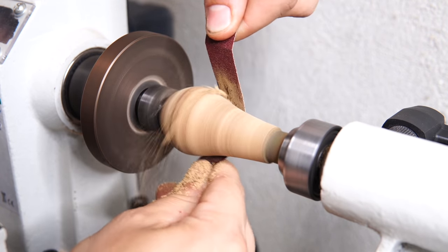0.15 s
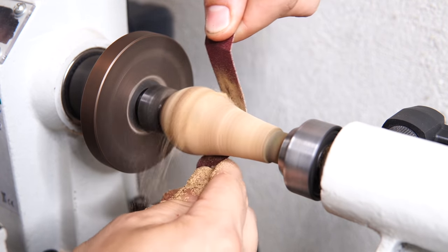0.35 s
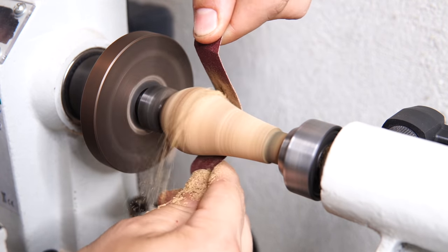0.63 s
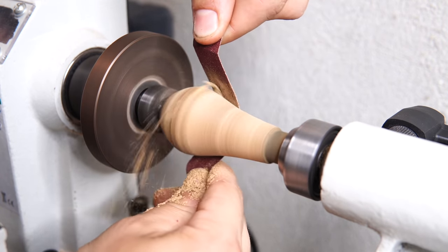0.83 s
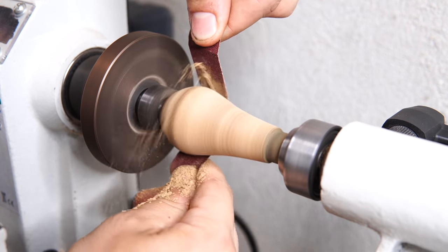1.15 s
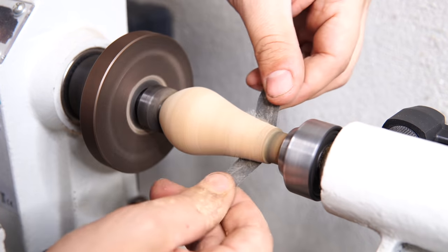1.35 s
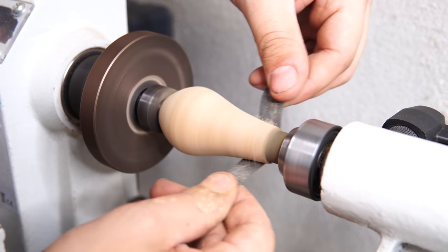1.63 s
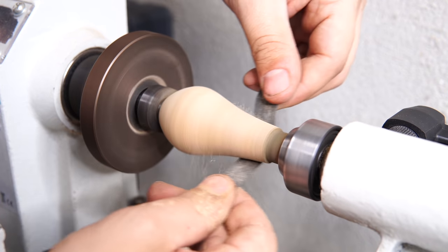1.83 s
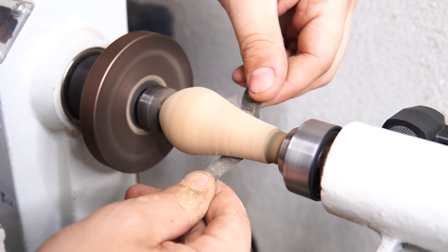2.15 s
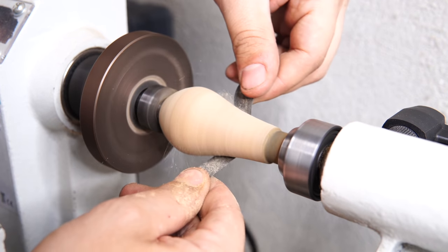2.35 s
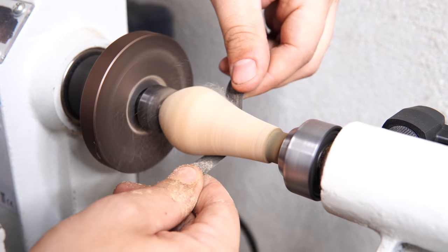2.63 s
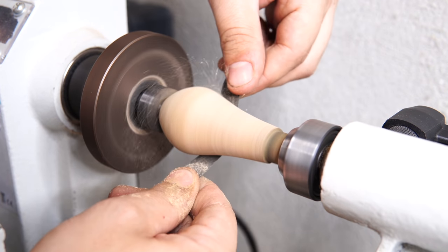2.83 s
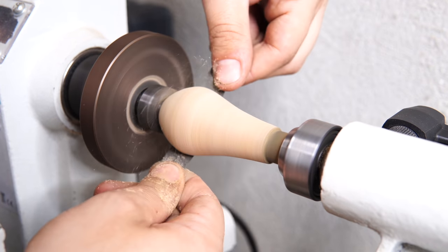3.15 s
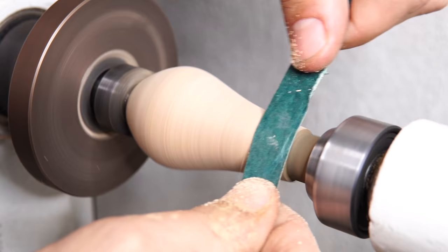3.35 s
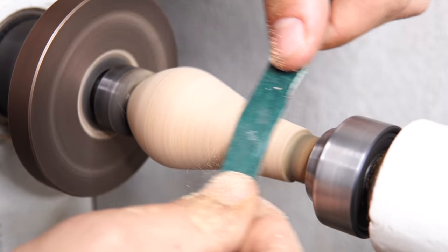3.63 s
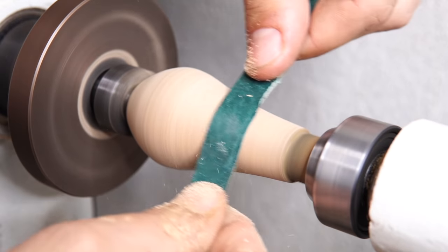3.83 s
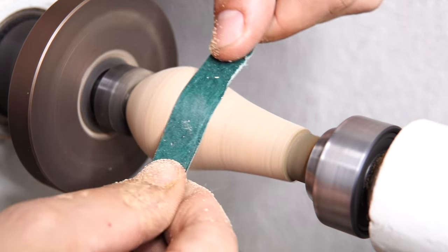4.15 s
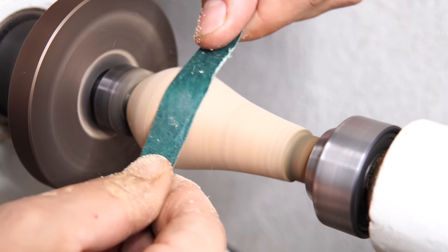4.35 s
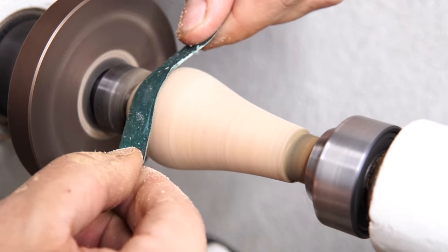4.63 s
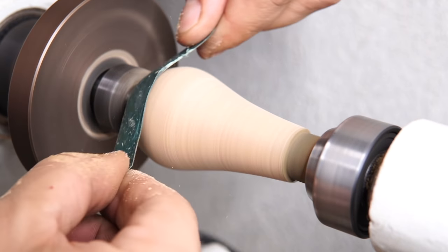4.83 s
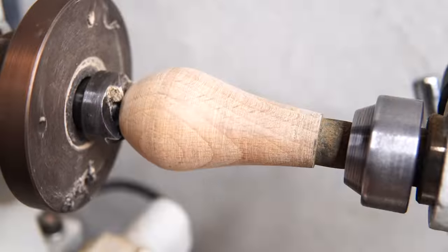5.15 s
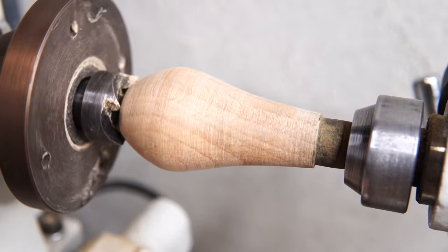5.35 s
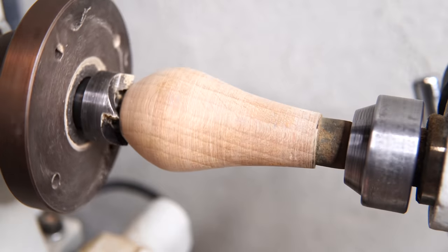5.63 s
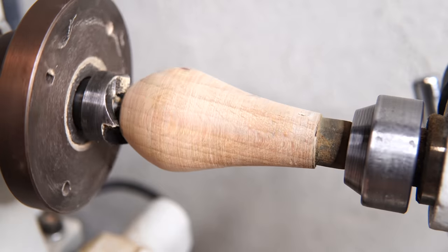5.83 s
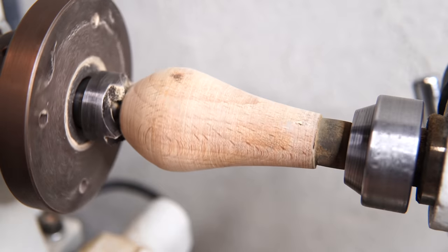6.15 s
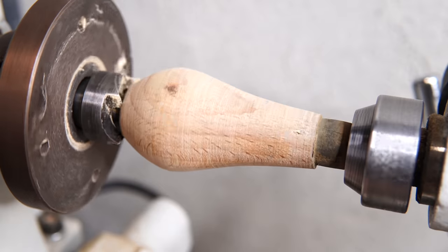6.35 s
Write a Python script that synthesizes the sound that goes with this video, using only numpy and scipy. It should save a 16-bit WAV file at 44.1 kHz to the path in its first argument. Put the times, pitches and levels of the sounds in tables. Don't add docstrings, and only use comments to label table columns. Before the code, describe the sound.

Loud gritty sanding of turning wood, stepping softer with each paper above a lathe's hum and whir, then only faint room tone and hiss.

```python
import sys
import numpy as np
from scipy import signal
from scipy.fft import rfft, irfft
from scipy.io import wavfile
from scipy.ndimage import uniform_filter1d

SR = 44100
rng = np.random.default_rng(int(sys.argv[2]) if len(sys.argv) > 2 else 0)


def unload_wav(signal):
    wavfile.write(
        sys.argv[1],
        SR,
        np.round(np.clip(np.atleast_2d(signal).T, -1, 1) * 32767).astype(np.int16),
    )


def ratio(d):
    e = np.asarray(d, float) / 20
    return 10 ** e


N = 286650
FRAME, HOP = 1024, 256
HUM_HZ = 99.96

SCENE_STARTS = [0, 1.3072, 3.3873, 5.0673]
SPINDLE_HZ = [23.673, 23.742, 23.748]
# time_s, pressure_db, surface_speed_db (heard as brightness)
STROKES = [
    [(0.0, -15, -4.5), (0.018, -15.5, -3), (0.316, -17.5, -3.5), (0.44, -16, -3), (1.024, -21, -1),
     (1.044, -19.5, -0.5), (1.138, -22, -1.5), (1.298, -18, -1.5), (1.306, -14, 3)],
    [(1.31, -22, 0), (1.49, -18.5, 2), (1.51, -21.5, 0), (2.44, -25, -3), (2.66, -20, -0.5),
     (3.08, -25, -2), (3.22, -22, -0.5), (3.37, -24, -0.5), (3.39, -24, -2)],
    [(3.389, -24.5, -2.5), (3.701, -25.5, -1.5), (3.729, -26.5, -4), (4.355, -21.5, -1.5),
     (4.447, -25, -1.5), (4.559, -24, -0.5), (4.653, -29, -1.5), (5.066, -30.5, -1.5)],
]


def evened(x):
    return x / np.sqrt(np.mean(x ** 2) + 1e-20)


def read(points, hz):
    f, value = np.transpose(points)
    return np.interp(np.log(hz + 1), np.log(f + 1), value)


def bumps(rings, hz):
    return sum(db / (1 + (2 * (hz - f) / width) ** 2) for f, width, db in rings)


def hump(at, hz, start, end, from_hz, to_hz, db, width):
    along = np.clip((at[:, None] - start) / (end - start), 0, 1)
    centre = from_hz + (to_hz - from_hz) * along
    return db * np.sin(np.pi * along) ** .5 / (1 + (2 * (hz - centre) / width) ** 2)


def frame_axes(length):
    return np.arange(length // HOP + 5) * HOP / SR, np.fft.rfftfreq(FRAME, 1 / SR)


def patches(shape, frames, bins):
    field = uniform_filter1d(rng.standard_normal(shape), frames, axis=0)
    return evened(uniform_filter1d(field, bins, axis=1))


def noise(field_db, length):
    draws = rng.standard_normal(field_db.shape) + 1j * rng.standard_normal(field_db.shape)
    z = ratio(field_db) * draws
    return evened(signal.istft(z.T, nperseg=FRAME, noverlap=FRAME - HOP)[1][:length])


def coloured(colour_db, length):
    gain = ratio(colour_db(np.fft.rfftfreq(length, 1 / SR)))
    return evened(irfft(rfft(rng.standard_normal(length)) * gain, length))


def band(hz, width, length):
    return coloured(lambda f: -20 * np.log10(1 + (2 * (f - hz) / width) ** 2), length)


def workshop(length):
    # pitch_hz, density_db
    shop = [(12, -39), (20, -7), (38, -2), (184, -2), (334, -9), (417, -6), (520, -13.5), (694, -14.5),
            (1880, -26), (4000, -39), (5200, -54), (8800, -120)]
    room_rings = [(423, 17, 1), (333, 18, 2.2), (1000, 390, 5.0)]  # pitch_hz, width_hz, level_db
    return ratio(-51.5) * coloured(lambda hz: read(shop, hz) + bumps(room_rings, hz), length)


def distant_fan(length):
    return ratio(-67.5) * band(425, 36, length)


def motor(paper, t):
    rotor_hz = 24.53
    hum_turn = [-.44, -.309, .455]
    # multiple, lag_turns, far_db, near_db
    harmonics = [(1, 0, -31.3, -23), (2, .75, -42.3, -32.2), (3, .36, -49.4, -46), (5, .1, -67, -60),
                 (6, .6, -70, -59)]
    orders = [(2, 0, 0), (3, 0, 0), (4, 0, 0), (6, 0, 0), (9, 0, 0), (10, 0, 0), (24, 0, 0), (2.55, 0, 0),
              (8.247, 0, 0), (9.31, 0, 0), (9.685, 0, 0), (10.09, 0, 0), (10.195, 0, 0), (10.42, 0, 0),
              (12.37, 0, 0), (0, 0, 1), (0, 1, 1), (0, 3, -1), (0, 3, 1), (0, 6, -1),
              (30, 0, 0), (30, 0, 1), (30, 1, 0), (30, 1, 1), (30, 3, 1), (30, 3, 2), (44.55, 0, 0),
                   (10.345, 0, 0), (15.37, 0, 0), (24.83, 0, 0), (27.62, 0, 0), (30, -1, 0), (30, -1, 1)]
    # far_db, near_db
    tones = [(-70, -60), (-50.5, -42), (-65, -56), (-72, -54), (-66, -56), (-55, -47), (-64.5, -57),
             (-66, -58), (-59, -49), (-83, -56), (-66, -91), (-61, -49), (-57, -45.5), (-58, -46.5),
             (-59, -53.5), (-72, -59), (-68, -65), (-59.5, -52), (-60, -51), (-61.5, -59),
             (-64, -54.5), (-66, -62), (-65, -64), (-66.5, -54.5), (-57.5, -52), (-65, -57.5),
                  (-71, -59), (-54, -48), (-73, -58), (-78, -65), (-74, -67), (-72, -58), (-76, -60.5)]
    # pitch_hz, density_db
    rumble_colour = [(12, -61), (20, -33), (43, -26), (67, -11), (98, -15.5), (127, -12), (150, -13.5),
                     (205, -4.5), (418, -9), (927, -8.5), (1030, -3.5), (1970, -44), (3000, -34),
                     (3900, -59), (6600, -120)]
    # pitch_hz, width_hz, level_db
    rumble_rings = [(72, 14, 6), (240, 63, 4), (590, 50, 0.5), (757, 41, -8), (873, 24, 4),
                    (1027, 94, -8.5)]
    rumble_db = [-50, -42, -42]

    near = min(paper, 1)
    turns = HUM_HZ * t + hum_turn[paper]
    hum = sum(ratio(db[near]) * np.cos(2 * np.pi * (k * turns + lag)) for k, lag, *db in harmonics)
    knots = np.arange(t[0], t[-1] + .2, .2)
    for multiples, db in zip(orders, tones):
        hz = np.dot(multiples, [SPINDLE_HZ[paper], HUM_HZ, rotor_hz])
        sway_db, drift = rng.standard_normal((2, len(knots)))
        phase = 2 * np.pi * (hz * t + rng.random()) + 0.61 * np.interp(t, knots, drift)
        hum = hum + ratio(db[near] + 1.3 * np.interp(t, knots, sway_db)) * np.cos(phase)
    rumble = coloured(lambda hz: read(rumble_colour, hz) + bumps(rumble_rings, hz), len(t))
    throb = 1 + 0.14 * np.cos(2 * np.pi * rotor_hz * t) + 0.13 * np.cos(2 * np.pi * turns)
    return np.sqrt(2) * hum + ratio(rumble_db[paper]) * throb * rumble


def whine(paper, t):
    level_db = -60.5 if paper == 0 else -47.5
    swell_hz, swell_top_s = 1.73, 1.55
    hz = 30 * SPINDLE_HZ[paper] + 3 * HUM_HZ
    drift = evened(uniform_filter1d(rng.standard_normal(len(t)), size=3000))
    swell = 1 + .45 * np.cos(2 * np.pi * swell_hz * (t - swell_top_s))
    return np.sqrt(2) * ratio(level_db) * swell * np.cos(2 * np.pi * hz * t + .3 * drift)


def knock(paper, t):
    knock_db = [-41, -52, -49]
    sharpness = 1.2
    s, press_db, _ = np.transpose(STROKES[paper])
    flare = np.exp(sharpness * np.cos(2 * np.pi * (SPINDLE_HZ[paper] * t + rng.random())))
    pressed = ratio(0.41 * (np.interp(t, s, press_db) - press_db.mean()))
    return ratio(knock_db[paper]) * pressed * evened(flare * band(2880, 300, len(t)))


def whirr(paper, t):
    # pitch_hz, width_hz, level_db
    casting = [(1789, 64, -2), (2458, 77, 2), (2980, 118, -12), (3227, 60, 2.5), (3730, 36, -4),
               (4720, 180, -4.5), (4800, 46, 3.5), (5370, 120, -5), (6100, 130, 5.5), (6720, 59, -12),
               (6900, 57, -9), (7730, 64, -18)]
    whirr_db = [-43.5, -46.5, -46.5]

    def colour_db(hz):
        return 20 * np.log10(sum(ratio(db) / (1 + (2 * (hz - f) / width) ** 2) for f, width, db in casting))

    return ratio(whirr_db[paper]) * coloured(colour_db, len(t))


def strip_contact(at, hz):
    # start_s, end_s, from_hz, to_hz, level_db
    skids = [
        (1.18, 1.27, 14400, 12600, 6),
        (1.24, 1.33, 12600, 11700, 6),
        (.33, .78, 4600, 5200, 4),
        (1.93, 2.04, 11500, 14000, 5.5),
        (2.5, 3.1, 4100, 4000, -2),
        (2.9, 3.25, 7500, 8500, 4),
        (3.12, 3.4, 14000, 15500, 3.5),
        (4.45, 4.62, 12500, 14500, 4),
    ]
    # start_s, end_s, pitch_hz, level_db
    rests = [(0.8, 1.18, 14750, 2.5), (1.3, 1.28, 3500, 2.5), (1.22, 2, 14800, -2), (1.35, 1.25, 2900, -3),
             (-1.5, 1, 2900, .5), (.78, 1.1, 3900, -3), (1.2, 1.48, 4500, 4), (1.8, 1.95, 4400, 5),
             (1.96, 1.8, 1700, 6), (2.23, 2.42, 4450, 5), (2, 2.9, 6550, 3.5), (1.5, 3.1, 6400, 3.5),
             (2.05, 2.8, 1970, 3.5), (0.1, 1.0, 6300, 4), (0, 1.15, 11100, -4), (4, 2.7, 19000, 6),
             (4, 4.2, 7900, 2), (3.0, 2.4, 4000, -2.5), (4.5, 4.4, 8950, 1), (2.5, 4.1, 3900, 3.5),
             (4, 5.25, 5800, -6), (4.4, 5.1, 4400, -2.5), (3.38, 4.44, 5400, -2.5), (1, 1.35, 4200, -2),
             (-0.3, 0.23, 4200, -2), (0.5, 1.75, 6200, 1.5), (1.3, 1.55, 13500, -2), (1.3, 1.55, 15000, -2),
             (3.05, 3.4, 3300, -2), (3.05, 3.4, 4700, -2), (.15, .55, 6000, -2), (1.9, 2.2, 6000, -2)]
    # start_s, end_s, pitch_hz, level_db
    sings = [(2.18, 2.4, 6560, 2.5), (0.3, 1.95, 6400, 2), (1.5, 2.82, 6200, 2), (2.5, 3.15, 7800, 3.5),
             (1.3, 1.7, 4900, 3.5), (1, 1.66, 3000, 3), (2.05, 2.15, 3000, 5), (2.5, 2.8, 2900, 4),
             (2.5, 2, 3550, -3), (2.3, 1.9, 4500, -3), (.25, .62, 3460, -2), (0.7, 1.09, 3750, -9),
             (1, 0.49, 4540, 3), (1, 0.76, 3850, 1.5), (2.0, 2.4, 5700, -3), (0.7, .75, 3300, 4.5),
             (0.6, .65, 3270, 3), (-.1, .6, 2150, -3), (0.6, 1.31, 4000, -4), (4.28, 5.3, 2600, 2.5),
             (4.55, 5.1, 5550, -5), (4, 3.9, 4000, -4), (4, 3.7, 6150, 4), (4.2, 5, 5600, 3),
             (2.6, 2.85, 5300, -3), (1.7, 1.95, 9300, 4), (2.15, 2.3, 8100, 2), (3.5, 3.88, 7950, 4),
             (3.5, 4.4, 13000, -2), (3.4, 4.0, 10000, 3), (.6, 1.2, 14750, 3), (0.5, .75, 9650, 3),
             (-0.5, .5, 10450, -3), (.1, 0.82, 11100, 4), (0, 0.86, 9800, 5), (0.3, 1.0, 7650, 5),
             (1.5, 2.2, 7500, 5), (2.95, 3.3, 9800, 5), (3.5, 3.9, 12450, -3), (3, 2.7, 9700, 3),
             (2.3, 2.95, 10300, -4), (5, 5.4, 9200, 4), (1.0, 1, 15600, 4), (1.3, 1.35, 6200, -5),
             (2.5, 3.35, 4000, -4)]
    # start_s, end_s, level_db
    lifts = [
        (1.887, 1.94, 0),
        (3.7, 3.778, -1),
        (4.555, 4.673, -1.5),
    ]
    field = 0
    for start, end, from_hz, to_hz, db in skids + [(start, end, f, f, db) for start, end, f, db in rests]:
        width_hz = 400 + .06 * from_hz
        field = field + hump(at, hz, start, end, from_hz, to_hz, db, width_hz)
    for start, end, f, db in sings:
        field = field + hump(at, hz, start, end, f, f, db, 310)
    for start, end, db in lifts:
        field = field + hump(at, hz, start, end, 11000, 11000, db, 8700)
    return field


def sandpaper(paper, t):
    reach_hz = [2500, 3800, 4600, 6400, 7600, 11200, 12000, 15700]
    press_share = [(.1, 0.39, 1.2, 0.9), (.3, 0.23, 1.4, 0.91), (.5, .8, .95, 1.01)]
    speed_share = [(.1, -0.7, -1.3, 0.55), (-0.33, -0.23, -1.1, 0.82), (-0.23, 0.13, -1.3, 1.01)]
    # pitch_hz, density_db
    papers = [
        [(760, -36), (1300, -25.5), (1780, -18), (2260, -19.5), (2840, -9), (3530, -13), (3830, -12),
         (4210, -10.5), (6250, -5.5), (6860, -4.5), (7610, -2), (10300, -3.5), (11900, 0.5), (14700, 1),
         (15600, -15)],
        [(880, -16.5), (1500, -9.5), (1810, -11), (1990, -10.5), (2810, -7.5), (3620, -5.5), (4770, -5.5),
         (5210, -5.5), (6460, -6), (8250, -0.5), (14900, 3.5), (15600, -6.5)],
        [(880, -49), (1500, -9), (1840, -16.5), (1990, -12), (2180, -12), (2860, -8.5), (3450, -14),
         (4810, -9.5), (5310, -12.5), (6780, -4.5), (8840, -2), (10900, -2), (14300, 2), (15600, -5.5)],
    ]
    # pitch_hz, width_hz, level_db
    rings = [
        [(2120, 190, -3.5), (2800, 310, 2.5), (3810, 160, 8), (6420, 140, 3), (7540, 270, 2.5), (8500, 220, 2),
         (9300, 260, 3), (13200, 150, 3), (15100, 260, 6), (15300, 550, 0)],
        [(1880, 75, 8.5), (1983, 140, -14), (2860, 67, 4), (4720, 240, 2), (6500, 1300, 4), (7560, 200, 1),
         (12700, 350, 2), (15300, 360, 1.5)],
        [(1846, 56, 10), (1980, 150, -8), (2930, 110, 2.5), (3680, 110, 3), (4940, 100, 1), (5300, 230, 3),
         (5700, 130, 6.5), (6700, 130, 5.5), (8950, 290, 3), (12900, 200, -0.5), (14200, 230, -1),
         (15200, 660, 5.5), (3240, 73, 7), (7360, 110, 2)],
    ]
    paper_db = [-17, -20.5, -23.5]

    s, press_db, speed_db = np.transpose(STROKES[paper])
    at, hz = frame_axes(len(t))
    pressed = np.outer(np.interp(at + t[0], s, press_db), press_share[paper])
    sped = np.outer(np.interp(at + t[0], s, speed_db), speed_share[paper])
    shift = pressed + sped
    shift -= 10 * np.log10(np.mean(ratio(2 * shift), 0))
    colour = read(papers[paper], np.minimum(hz, 14900)) + bumps(rings[paper], hz)
    strokes = [read(np.c_[reach_hz, np.repeat(row, 2)], hz) for row in shift]
    field = colour + strip_contact(at + t[0], hz) + strokes
    field += 1.6 * patches(field.shape, frames=75, bins=3)
    field += 1.05 * patches(field.shape, frames=8, bins=12)
    turn = 2 * np.pi * SPINDLE_HZ[paper] * t + 6 * rng.random()
    runout = 1 + 0.079 * np.cos(turn) + 0.044 * np.cos(2 * turn + 1)
    clumps = evened(uniform_filter1d(rng.standard_normal(len(t)), size=60))
    bite = ratio(.6 * clumps)
    return ratio(paper_db[paper]) * runout * bite * noise(field, len(t))


def side_flecks():
    # centre_s, low_hz, high_hz, level_db
    flecks = [(.358, 10200, 12000, -25), (.381, 9500, 11100, -31), (.381, 14400, 15780, -30),
              (0.867, 13100, 16000, -23), (2.099, 6840, 8300, -33), (2.099, 8900, 10400, -32),
              (3.004, 11700, 13200, -31.5), (3.654, 6230, 8300, -35), (4.467, 5600, 7700, -36),
              (5.07, 3460, 15400, -52)]
    length = 1400
    side = np.zeros(N)
    for s, low_hz, high_hz, db in flecks:
        burst = coloured(lambda hz: np.where((hz > low_hz) & (hz < high_hz), 0, -90), length)
        side[round(s * SR) - length // 2:][:length] += ratio(db) * burst * np.hanning(length)
    return side


def brushes():
    # start_s, length_s, pitch_hz, level_db
    scrapes = [
        (3.425, .11, 4300, -35.5),
        (3.42, .16, 2500, -42),
        (1.105, .09, 3300, -35),
        (1.27, .037, 3700, -35),
    ]
    out = np.zeros(N)
    for start, length, hz, db in scrapes:
        t = np.arange(round(length * SR)) / SR
        swell = np.minimum(t / 0.0056, 1) * (1 - t / length) ** .5
        out[round(start * SR):][:len(t)] += ratio(db) * swell * band(hz, 0.33 * hz, len(t))
    return out


def flutter(t):
    # start_s, hold_s, level_db, pitch_hz
    tug_table = [(1.3, .12, -40, 1140), (1.553, 0.18, -40.5, 1220), (1.93, .14, -39, 1150),
                 (2.353, 0.12, -37.5, 1220), (2.55, 0.29, -41, 1270), (2.997, 0.13, -41, 1240),
                 (3.154, 0.12, -39.5, 1240), (3.475, .04, -43, 1130), (3.84, .05, -53, 1260),
                 (4.0, 0.068, -46, 1210), (4.2, .07, -43, 1130), (4.337, 0.36, -47, 1160),
                 (4.954, .12, -52, 1180)]
    tug_s, slacken_db_per_s, tighten_hz_per_s = 0.019, 60, 230
    slack_db, width_hz = -49, 260
    start, hold, db, hz = np.transpose(tug_table)[..., None]
    since = t - start
    fall_db = slacken_db_per_s * np.maximum(since - hold, 0)
    tugs = ratio(db - fall_db) ** 2 * np.clip(since / tug_s, 0, 1)
    climbing = hz + tighten_hz_per_s * np.clip(since, 0, hold)
    pitch = (tugs * climbing).sum(0) / (tugs.sum(0) + 1e-30)
    turn = np.exp(2j * np.pi * np.cumsum(pitch) / SR)
    r = np.exp(-np.pi * width_hz / SR)
    slow = signal.lfilter([1], np.poly([r, r]), rng.standard_normal(len(t)) / turn)
    buzz = ratio(-3.0) * evened((turn * slow).real)
    return np.sqrt(tugs.sum(0) + ratio(2 * slack_db)) * buzz * (t >= start[0])


def eased_rings():
    # pitch_hz, width_hz, level_db
    thin_rings = [(4980, 100, -51), (3640, 100, -52.5), (3150, 90, -58)]
    t = np.arange(N) / SR
    eased = np.clip((t - 4.3) / .15, 0, 1) * (t < SCENE_STARTS[3])
    return eased * sum(ratio(db) * band(hz, width, N) for hz, width, db in thin_rings)


def scene():
    mix = workshop(N) + distant_fan(N)
    for paper in range(3):
        span = np.arange(round(SCENE_STARTS[paper] * SR), round(SCENE_STARTS[paper + 1] * SR))
        t = span / SR
        mix[span] += motor(paper, t) + whine(paper, t) + knock(paper, t) + whirr(paper, t)
        mix[span] += sandpaper(paper, t) + flutter(t)
    mix += brushes() + eased_rings()
    return np.array([mix, mix])


def top_cut(x):
    return signal.sosfilt(signal.butter(12, 15770, fs=SR, output="sos"), x)


def record(dry):
    hiss_db, side_db = -60.5, -60.5
    common, opposed = rng.standard_normal(dry.shape)
    quiet = np.arange(N) > SCENE_STARTS[3] * SR
    side = ratio(side_db) * opposed * quiet + side_flecks()
    wired = dry + ratio(hiss_db) * common + np.array([side, -side])
    edge = signal.firwin(1023, 15830, window=("kaiser", 10), fs=SR)
    wired = signal.oaconvolve(wired, edge[None], "same", axes=1)
    return top_cut(wired)


dry = scene()
out = record(dry)
unload_wav(out)
```